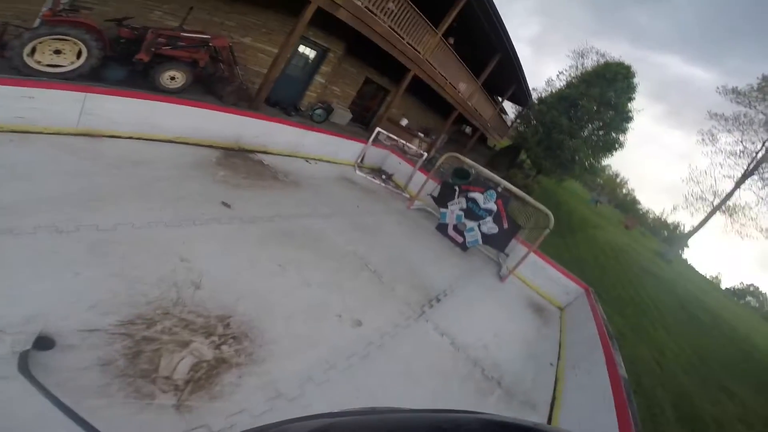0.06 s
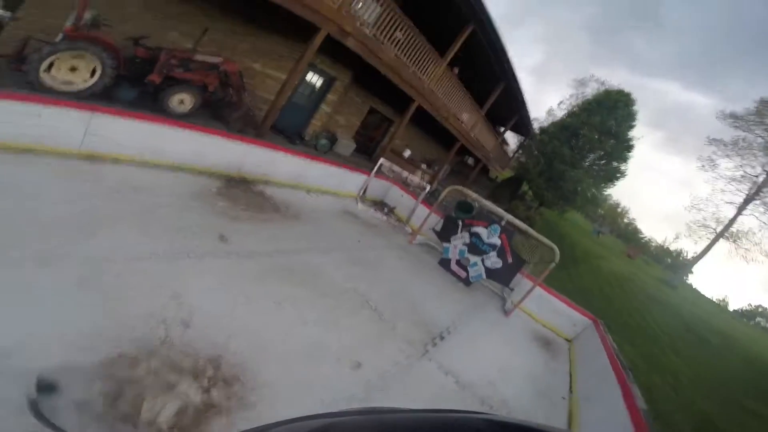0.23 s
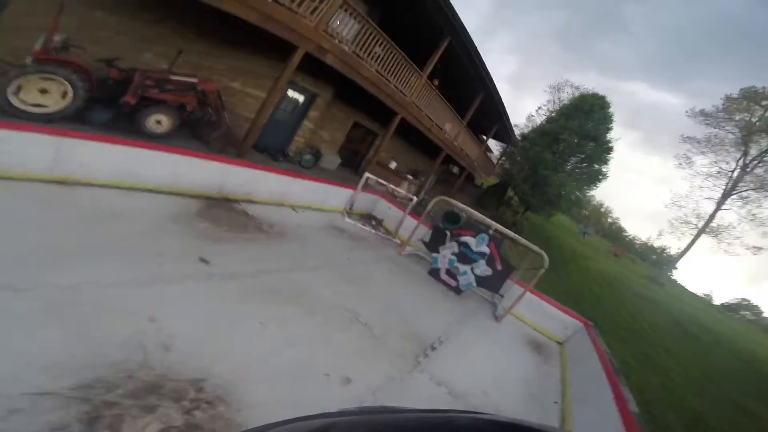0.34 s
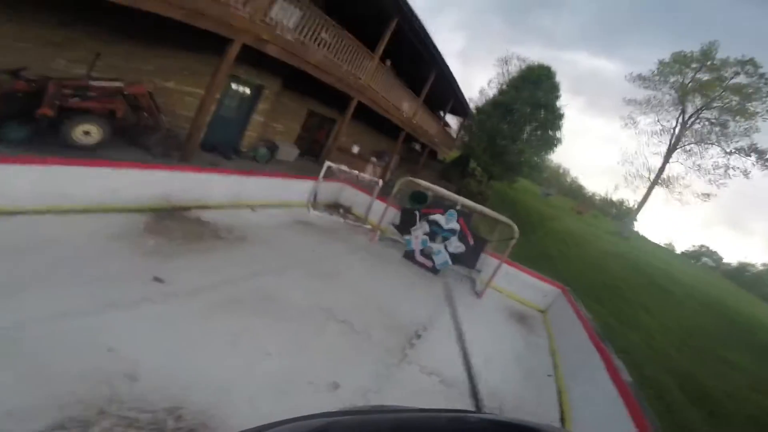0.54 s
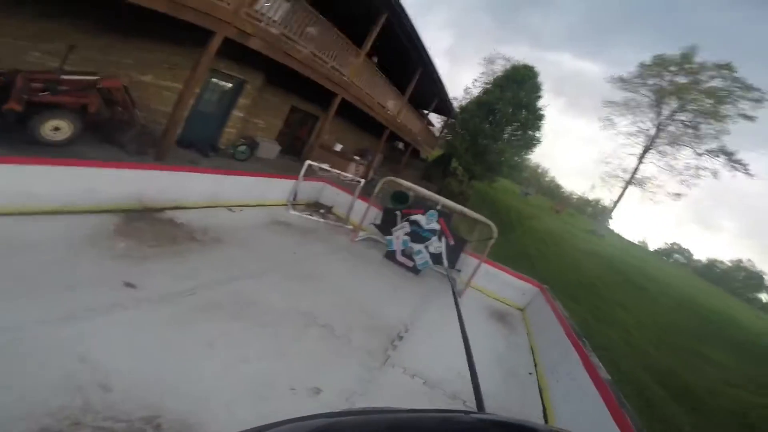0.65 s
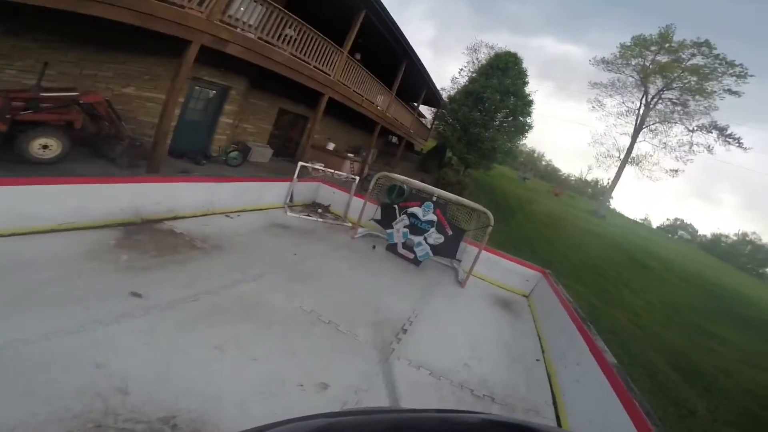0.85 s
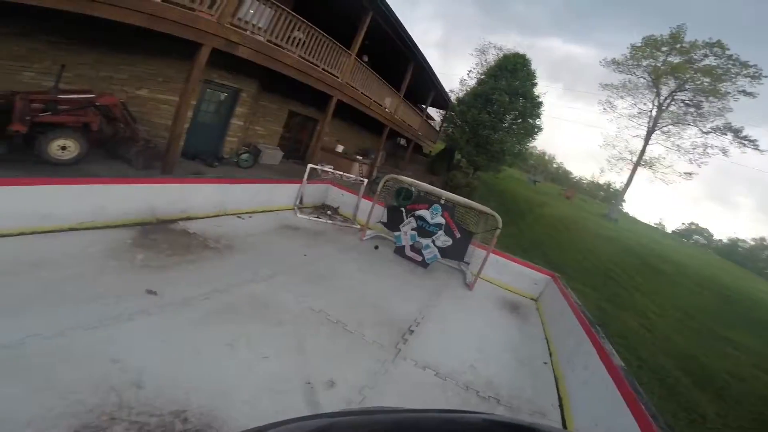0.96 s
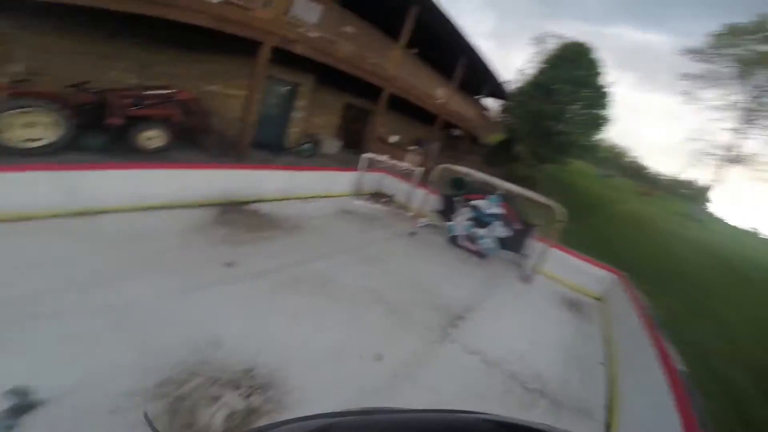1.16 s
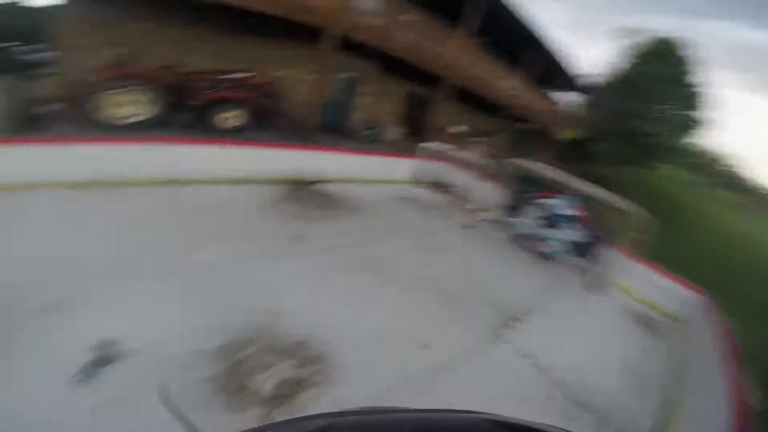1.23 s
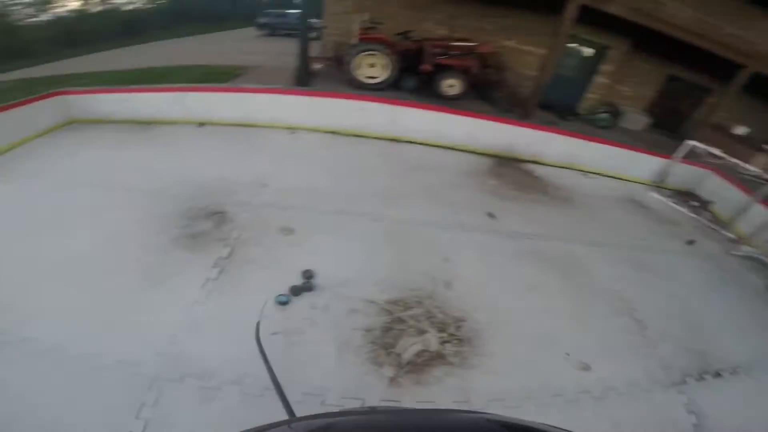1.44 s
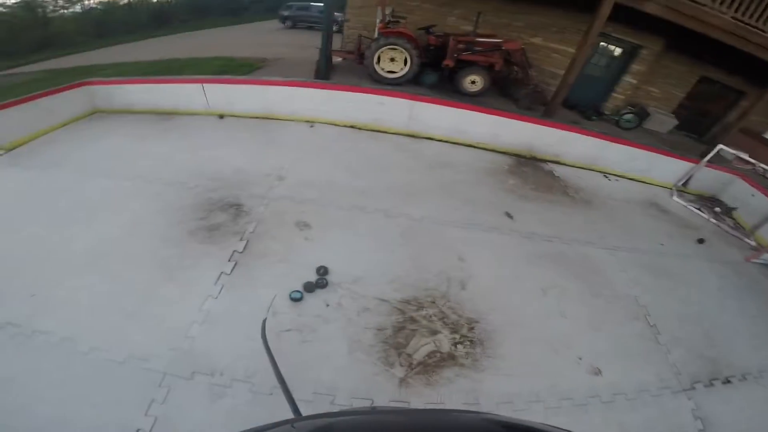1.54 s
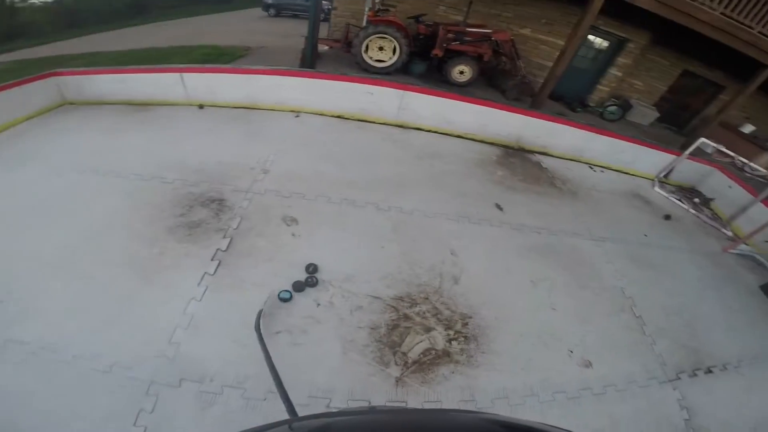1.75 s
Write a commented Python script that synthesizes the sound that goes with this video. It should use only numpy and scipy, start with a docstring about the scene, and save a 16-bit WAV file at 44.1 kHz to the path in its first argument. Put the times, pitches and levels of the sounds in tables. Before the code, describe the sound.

A hockey shot on outdoor plastic tiles: faint stick taps around 0.2 s, a gritty hissing scrape near 0.4, then a hard bright crack at 0.52-0.57. The puck bangs the goal at 0.76 with boom and rattle, slapping the floor at 0.96. A sole groans softly near 1.2, feet shuffle, and the blade knocks pucks at 1.5 and 1.7. Wind buffets low; short yard echo, faint thin whine.

```python
"""A blade scrapes and hisses over plastic tiles, slaps the floor and cracks against a puck: a backyard hockey shot.
The puck bangs into a goal that booms and rattles, then drops on the tiles; feet shift and the blade nudges new pucks.
Solid blows are damped sine modes over short noise cracks; scrapes are grainy noise; the groan and chatter are
sines of unsteady pitch. A noise tail gives the yard's echo, over buffeting air, yard noise and a thin whine."""
import sys
import numpy as np
from scipy import signal
from scipy.fft import rfft, irfft, next_fast_len
from scipy.io import wavfile
from scipy.ndimage import uniform_filter1d, map_coordinates

SR = 44100
rng = np.random.default_rng(int(sys.argv[2]) if len(sys.argv) > 2 else 0)


def int16_out(signal):
    """Quantize to a 16-bit WAV file."""
    q = np.round(np.clip(np.atleast_2d(signal).T, -1, 1) * 32767)
    wavfile.write(sys.argv[1], SR, q.astype(np.int16))


N = 79380  # samples, 1.8 s


def amp(db):
    """Linear gain from dB."""
    return 10 ** (np.asarray(db) / 20)


def unit(x):
    """x at rms 1."""
    return x / np.sqrt(np.mean(x ** 2) + 1e-20)


def along(points, hz):
    """Value at hz between (hz, value) points, on a log frequency axis."""
    f, v = np.transpose(points)
    return np.interp(np.log(hz + 1), np.log(f + 1), v)


def curve(rows):
    """One value per sample from (s, value) rows."""
    return np.interp(np.arange(N) / SR, *np.transpose(rows))


def wobble(rate):
    """A smooth random curve with rate knots a second."""
    knots = rng.standard_normal(N // 8)
    return map_coordinates(knots, [np.arange(N) * rate / SR])


def coloured(x, colour):
    """x shaped by a spectrum of (hz, db) points, at rms 1."""
    gain = amp(along(colour, np.fft.rfftfreq(N, 1 / SR)))
    return unit(irfft(rfft(x) * gain, N))


def noise(colour):
    """Steady coloured noise at rms 1."""
    return coloured(rng.standard_normal(N), colour)


def burst(colour, t60):
    """Coloured noise with a fast attack that dies away 60 dB in t60 seconds."""
    t = np.arange(N) / SR
    return noise(colour) * amp(-60 * t / t60) * (1 - np.exp(-t / 0.0003))


def ring(modes, share=1):
    """Damped sine modes of alternating sign, their levels a little different at every blow."""
    t = np.arange(SR // 2) / SR
    y = np.zeros(len(t))
    for k, (hz, db, t60) in enumerate(modes):
        decay = amp(db + rng.normal(0, 1) - 60 * t / (t60 * share))
        y += (-1) ** k * decay * np.sin(2 * np.pi * hz * t)
    return np.pad(y * (1 - np.exp(-t / 0.00039)), (0, N - len(t)))


def tilted(treble_db, hz, half_hz):
    """Smooth treble tilt in dB: half of treble_db at half_hz, nearly all of it far above."""
    return treble_db * hz ** 2 / (hz ** 2 + half_hz ** 2)


def add(track, s, x):
    """Mix x into the track at time s."""
    i = int(s * SR)
    track[i:i + len(x)] += x[:N - i]


# Yard echo decay: hz, t60_s
ECHO_DECAY = [(200, 0.32), (1000, 0.29), (2500, 0.32), (6000, 0.24), (14000, 0.19)]


def echo(x, wet_db, build_s):
    """x with the scattered answer of the boards and house: a noise tail that builds, then fades by frequency."""
    hz, t, z = signal.stft(rng.standard_normal(SR // 2), SR, nperseg=256)
    decay = amp(-60 * t / along(ECHO_DECAY, hz)[:, None])
    tail = signal.istft(z * decay * (1 - np.exp(-t / build_s)), SR, nperseg=256)[1]
    return x + amp(wet_db) * signal.fftconvolve(x, tail / np.linalg.norm(tail))[:N]


CRACK_DB = -5  # crack against ring, for the shot and the nudges
STICK_CRACK_T60_S = 0.037  # before each contact's ring share
# The shot, stick on floor and puck: start_s, level_db, ring_share (scales t60), treble_db, body_db (below 1 kHz)
STICK_CONTACTS = [(0.175, -39.5, 1.1, 4, 7), (0.227, -45.5, 2.3, 8, 12.5), (0.522, -19, 1.85, -10, 1),
                  (0.5266, -21, 1.1, -17, 10), (.547, -21, 0.58, -19, 8), (0.5704, -11, 0.33, 7.5, 7.5)]
# Stick modes before tilt and share: pitch_hz, level_db, t60_s
STICK_MODES = [(515, -21, 0.086), (1120, -17, 0.034), (1295, -13, 0.04), (1528, 0.5, 0.025),
               (1622, -6, 0.032), (1817, -5, 0.054), (2060, -11, 0.065), (2330, 1.5, 0.023),
               (2930, -30, 0.066), (4320, -18, 0.024), (5990, -21, 0.017)]
# Crack spectrum before tilt: hz, level_db
STICK_CRACK_COLOUR = [(150, -4), (330, -18), (550, -3.5), (950, -12.5), (1350, 14.5), (2400, 0),
                      (3200, -7.5), (7000, -19), (8200, -32), (15000, -48)]


def stick():
    """Each contact rings the stick over a short crack; the hardest hit is bright and damped quickly."""
    y = np.zeros(N)
    strength = np.linalg.norm([amp(level) for _, level, _ in STICK_MODES]) / np.sqrt(2)
    for s, db, share, treble_db, body_db in STICK_CONTACTS:
        def tilt(hz):
            return tilted(treble_db, hz, 3000) + body_db * (hz < 1000)

        crack_colour = [(hz, level + tilt(hz)) for hz, level in STICK_CRACK_COLOUR]
        crack = burst(crack_colour, STICK_CRACK_T60_S * share)
        modes = ring([(hz, level + tilt(hz), t60) for hz, level, t60 in STICK_MODES], share)
        add(y, s, amp(db) * (modes / strength + amp(CRACK_DB) * crack))
    return echo(y, wet_db=-21.0, build_s=0.009)


def blows(hits, modes, colour, ring_db, t60, wet_db, build_s):
    """The puck strikes something: its modes ring dry, and a noise clatter scatters round the yard."""
    y = np.zeros(N)
    for s, db in hits:
        clatter = echo(burst(colour, t60), wet_db, build_s)
        add(y, s, amp(db) * (amp(ring_db) * ring(modes) + clatter))
    return y


BOOM_S, BOOM_DB = .771, -27
# Puck against goal: start_s, level_db
GOAL_BANGS = [(.76, -25), (.7625, -23), (.768, -30.5)]
# Goal modes: pitch_hz, level_db, t60_s
GOAL_MODES = [(1162, -13.5, 0.091), (1610, -17, 0.067), (1820, -16, 0.24), (2024, -22, 0.12),
              (2336, -15, 0.083), (2537, -10, 0.052), (2660, 2, 0.053), (2800, -7.5, 0.064),
              (3273, -13, 0.044), (4240, -13, 0.053), (4620, 2, 0.028), (5820, -4.5, 0.02),
              (7150, -5, 0.014)]
# Goal clatter spectrum: hz, level_db
GOAL_CLATTER_COLOUR = [(150, -1.5), (280, -11), (450, 0), (900, -9), (1300, -1), (2800, -0.5),
                       (3800, -12.5), (4600, -4.5), (5200, -11), (7000, -10.5), (8200, -25), (15000, -35)]
# Low modes of the boards, before BOOM_DB: pitch_hz, level_db, t60_s
BOARD_MODES = [(224, 3, 0.061), (199, -18, 0.56)]
# Goal frame rattles: start_s, level_db
FRAME_RATTLES = [(.786, -35), (0.796, -30.5), (0.801, -35.5), (0.894, -49)]
# Frame rattle spectrum: hz, level_db
FRAME_RATTLE_COLOUR = [(300, -6), (1300, 5), (4800, -5), (6500, -0.5), (8200, -20), (15000, -32)]


def goal():
    """The bang rings the goal, the boards boom low and the frame rattles in noise bursts."""
    y = blows(GOAL_BANGS, GOAL_MODES, GOAL_CLATTER_COLOUR, ring_db=0, t60=0.023, wet_db=-1.5, build_s=0.02)
    add(y, BOOM_S, amp(BOOM_DB) * ring(BOARD_MODES))
    for s, db in FRAME_RATTLES:
        add(y, s, amp(db) * burst(FRAME_RATTLE_COLOUR, t60=0.04))
    return y


ZIP_S, ZIP_LENGTH_S, ZIP_FROM_HZ, ZIP_TO_HZ, ZIP_DB = 0.9585, 0.0065, 5800, 2300, -24.5
# Puck drops on the tiles: start_s, level_db
PUCK_LANDINGS = [(.9618, -27), (.968, -28.5), (.974, -32), (1.013, -36.5)]
# Tile modes, before ring_db: pitch_hz, level_db, t60_s
TILE_MODES = [(739, -14, 0.21), (1275, -8, 0.12), (1460, -10, 0.22), (1712, -17.5, 0.16),
              (2375, -10, 0.059), (2587, -1.5, 0.076), (2740, 0, 0.034), (3270, -22, 0.015)]
# Tile clatter spectrum: hz, level_db
TILE_CLATTER_COLOUR = [(150, -6.5), (550, -1), (1000, -7.5), (2600, 1), (3500, -10), (5000, -17),
                       (6500, -23.5), (8000, -43), (15000, -54)]


def landing():
    """The puck slaps the floor; high bending waves in the tiles arrive first, as a quick falling zip."""
    y = blows(PUCK_LANDINGS, TILE_MODES, TILE_CLATTER_COLOUR, ring_db=-4.0, t60=0.041, wet_db=-7, build_s=0.011)
    u = np.linspace(0, 1, int(ZIP_LENGTH_S * SR))
    hz = ZIP_FROM_HZ * (ZIP_TO_HZ / ZIP_FROM_HZ) ** u
    swell = np.sin(np.pi * u ** 2)  # peaks late
    add(y, ZIP_S, amp(ZIP_DB) * swell * np.sin(2 * np.pi * np.cumsum(hz) / SR))
    return y


GRIT_PER_S, GRIT_DB = 540, -5  # grains a second, and their level against the smooth noise
# Scrape spectrum: hz, level_db
SCRAPE_COLOUR = [(150, -26), (380, -12), (520, -7), (760, -18), (1150, -8.5), (1420, 1.5), (1900, -4.5),
                 (2200, -2), (2750, -7.5), (3300, -14.5), (5000, -54), (8000, -47), (14000, -58)]


def scrape():
    """Friction that sticks and slips: smooth noise plus random grains, coloured by the blade."""
    grit = (rng.random(N) < GRIT_PER_S / SR) * rng.standard_normal(N)
    return coloured(rng.standard_normal(N) + amp(GRIT_DB) * unit(grit), SCRAPE_COLOUR)


# Blade and puck sliding on the tiles, before the wobble: time_s, level_db
DRAG_LEVEL = [(0, -79), (.1, -60), (.16, -51.5), (.212, -50.5), (.232, -48), (.28, -59), (.345, -54),
              (.402, -36.5), (.456, -43), (.47, -47.5), (.512, -53.5), (.575, -48), (.612, -58.5),
              (.65, -42.5), (.722, -83), (.74, -45.5), (.756, -61)]
# High hiss of the scrape, before the wobble: time_s, level_db
HISS_LEVEL = [(0, -92), (.08, -70), (.24, -68.5), (.26, -64), (.35, -66), (.4, -50), (.455, -54.5),
              (.485, -64), (.52, -85)]
# Hiss spectrum: hz, level_db
HISS_SPECTRUM = [(1000, -20), (3400, 1.5), (4200, 6.5), (5300, -6), (6000, 1), (6500, 2.5), (7100, -13),
                 (8200, -19), (14000, -31)]
# Blade sliding up to the next puck: time_s, level_db
REACH_LEVEL = [(1.37, -80), (1.425, -56), (1.49, -61.5), (1.53, -88)]


def drag():
    """Blade and puck rub with an unsteady scrape and hiss, cut at the goal bang; later the blade slides alone."""
    slide = scrape() * amp(curve(DRAG_LEVEL)) + noise(HISS_SPECTRUM) * amp(curve(HISS_LEVEL))
    before_bang = np.arange(N) / SR < GOAL_BANGS[0][0]
    shot = slide * amp(2.2 * wobble(122.1)) * before_bang
    return shot + scrape() * amp(curve(REACH_LEVEL))


BITE_S, BITE_LENGTH_S, BITE_HZ, BITE_DB = 0.424, 0.024, 1395, -39  # peak time, swell width, mean pitch, peak


def bite():
    """The loaded blade judders as it bites into the tiles: a brief swell of sine with unsteady pitch."""
    u = (np.arange(N) / SR - BITE_S) / BITE_LENGTH_S
    pitch = BITE_HZ * (1 + 0.058 * wobble(600))
    return amp(BITE_DB) * np.exp(-u ** 2) * np.sin(2 * np.pi * np.cumsum(pitch) / SR)


# Blade against the next pucks: start_s, level_db, treble_db (tilts the crack)
PUCK_NUDGES = [(1.5085, -31, -21), (1.5135, -30.5, -10), (1.526, -34.5, 11), (1.534, -38.5, 25),
               (1.687, -41.5, 12), (1.701, -43.5, 9), (1.71, -39, 2)]
# Modes of the lightly touched blade: pitch_hz, level_db, t60_s
BLADE_MODES = [(1243, -9, 0.043), (1560, -14.5, 0.034), (2072, -11.5, 0.042), (2606, -17, 0.072)]
# Nudge crack spectrum before tilt: hz, level_db
NUDGE_CRACK_COLOUR = [(900, -24), (1400, 4.5), (2200, 10.5), (3300, -5), (5500, -23), (9000, -44)]


def nudges():
    """The blade meets a resting puck with a dull knock, then lighter, brighter ticks."""
    y = np.zeros(N)
    for s, db, treble_db in PUCK_NUDGES:
        colour = [(hz, level + tilted(treble_db, hz, 3500)) for hz, level in NUDGE_CRACK_COLOUR]
        crack = burst(colour, t60=0.039)
        add(y, s, amp(db) * (ring(BLADE_MODES) + amp(CRACK_DB) * crack))
    return echo(y, wet_db=-17.5, build_s=0.019)


# Steps and shuffles: start_s, thud_db, click_db
FOOTSTEPS = [(1.187, -55, -44.5), (1.2, -43.5, -43), (1.275, -39, -75), (1.326, -43, -49),
             (1.36, -39.5, -50), (1.47, -45, -50), (1.525, -40, -57)]
# Thud spectrum: hz, level_db
THUD_COLOUR = [(60, 0.5), (510, -0.5), (680, -12), (2000, -24), (6000, -76)]
# Click spectrum: hz, level_db
CLICK_COLOUR = [(200, 4), (1200, -4), (2700, 5.5), (4500, -11.5), (9000, -42)]


def steps():
    """The player's feet shift on the tiles: each step is a low thud burst and a higher click burst."""
    y = np.zeros(N)
    for s, thud_db, click_db in FOOTSTEPS:
        thud = amp(thud_db) * burst(THUD_COLOUR, t60=0.045)
        click = amp(click_db) * burst(CLICK_COLOUR, t60=0.051)
        add(y, s, thud + click)
    return echo(y, wet_db=-10.0, build_s=0.028)


RUB_JITTER = 0.0405  # share of the pitch
# A sole rubs as the player turns: time_s, pitch_hz (before jitter), level_db (sine peak)
SOLE_RUB = [(1.125, 619, -69), (1.192, 468, -54), (1.221, 535, -56.5), (1.25, 513, -75)]


def sole():
    """A twisting sole groans briefly on the plastic: a sine with jittering pitch."""
    t = np.arange(N) / SR
    s, hz, db = np.transpose(SOLE_RUB)
    pitch = np.interp(t, s, hz) * (1 + RUB_JITTER * wobble(280))
    rubbing = (t > s[0]) * (t < s[-1])
    return np.sin(2 * np.pi * np.cumsum(pitch) / SR) * amp(np.interp(t, s, db)) * rubbing


# Air on the microphone: time_s, level_db
BUFFET_LEVEL = [(0, -49), (.19, -44.5), (.24, -31.5), (.285, -41.5), (.32, -29.5), (.36, -41), (.4, -31.5),
                (.5, -35), (.545, -22.5), (.6, -25), (.74, -40.5), (.9, -48.5), (1.15, -43), (1.33, -42.5),
                (1.375, -37), (1.56, -46), (1.8, -44)]
# Buffeting spectrum: hz, level_db
BUFFET_SPECTRUM = [(10, -0.5), (38, 4.5), (50, -7), (63, 2), (82, -25), (115, -11), (160, -31), (1000, -80)]
# Upper rumble of the air: time_s, level_db
FLUTTER_LEVEL = [(0, -77), (.2, -52), (.34, -71), (.45, -40.5), (.57, -38), (.67, -79), (1.35, -68),
                 (1.5, -45.5), (1.56, -55), (1.8, -67.5)]
# Upper rumble spectrum: hz, level_db
FLUTTER_SPECTRUM = [(70, -5), (115, 0), (330, -20), (520, -18.5), (4000, -72)]


def buffeting():
    """Air buffets the microphone: low noise with its own swells evened out follows drawn swells, plus upper rumble."""
    z = signal.hilbert(noise(BUFFET_SPECTRUM))
    power = np.abs(uniform_filter1d(np.abs(z) ** 2, size=1500))
    even = z.real / np.sqrt(power + 1e-6)
    flutter = noise(FLUTTER_SPECTRUM) * amp(curve(FLUTTER_LEVEL))
    return unit(even) * amp(curve(BUFFET_LEVEL)) + flutter


YARD_DB = -59
# Yard spectrum: hz, level_db
YARD_SPECTRUM = [(110, -15), (180, 2.5), (517, -5.5), (1120, -9), (1430, -8.5), (2780, -11.5),
                 (2940, -15.5), (5730, -19), (15000, -36)]


def yard():
    """The quiet of the yard, as steady coloured noise."""
    return noise(YARD_SPECTRUM) * amp(YARD_DB)


# Electronic whine: pitch_hz, level_db (rms)
WHINE_TONES = [(8781, -84), (11719, -80.5)]


def whine():
    """Thin steady sine tones from electronics."""
    t = np.arange(N) / SR
    return sum(amp(db) * np.sqrt(2) * np.sin(2 * np.pi * hz * t) for hz, db in WHINE_TONES)


def scene():
    """All the layers summed into one channel."""
    shot = drag() + bite() + stick() + goal() + landing()
    player = steps() + sole() + nudges()
    air = buffeting() + yard() + whine()
    return (shot + player + air)[None]


TOP_HZ = 15350


def record(dry):
    """Nothing passes at or above the band limit."""
    m = next_fast_len(N + SR // 2)
    passed = np.fft.rfftfreq(m, 1 / SR) < TOP_HZ
    return irfft(rfft(dry, m) * passed, m)[..., :N]


dry = scene()
out = record(dry)
int16_out(out)
```